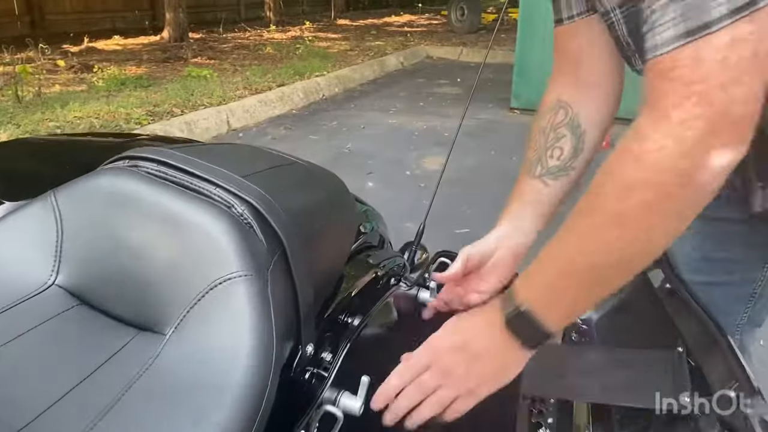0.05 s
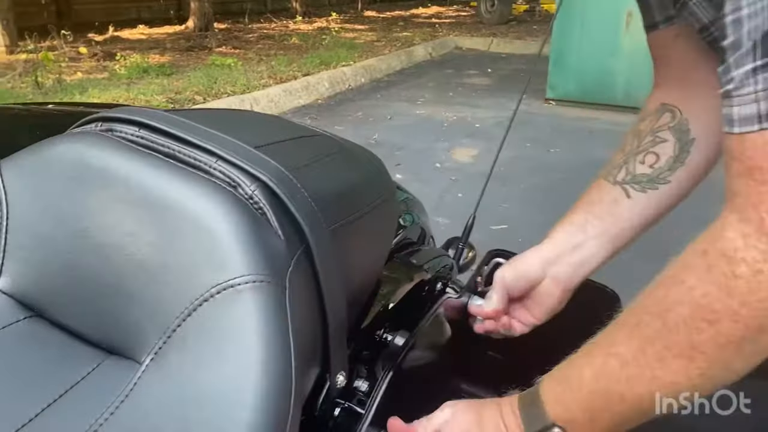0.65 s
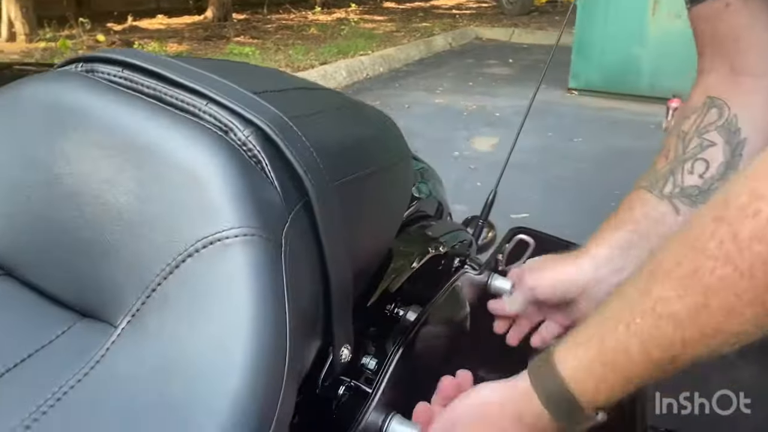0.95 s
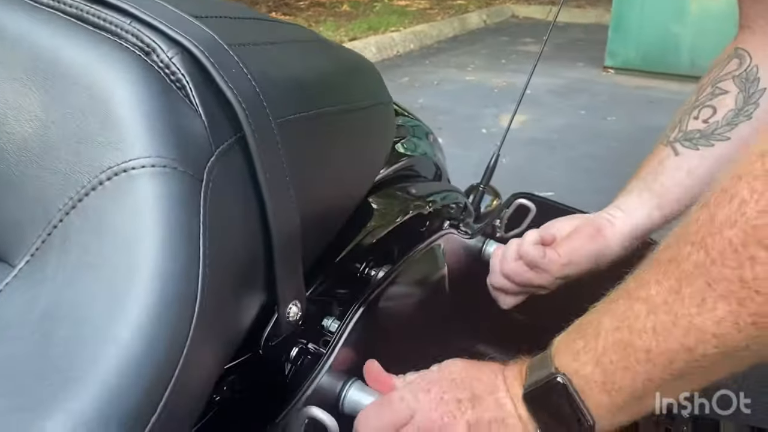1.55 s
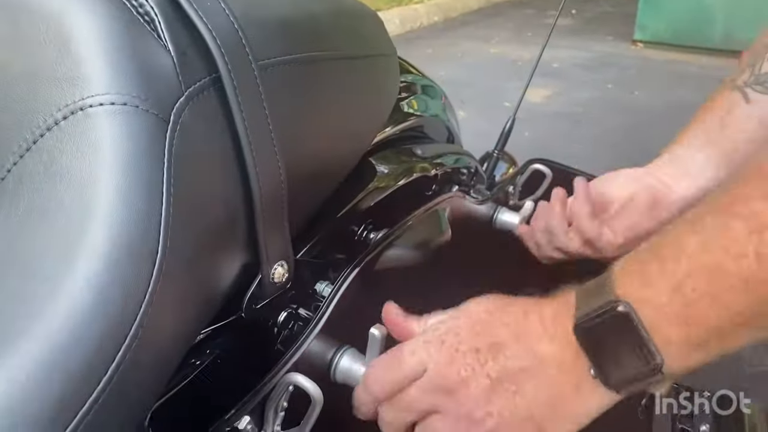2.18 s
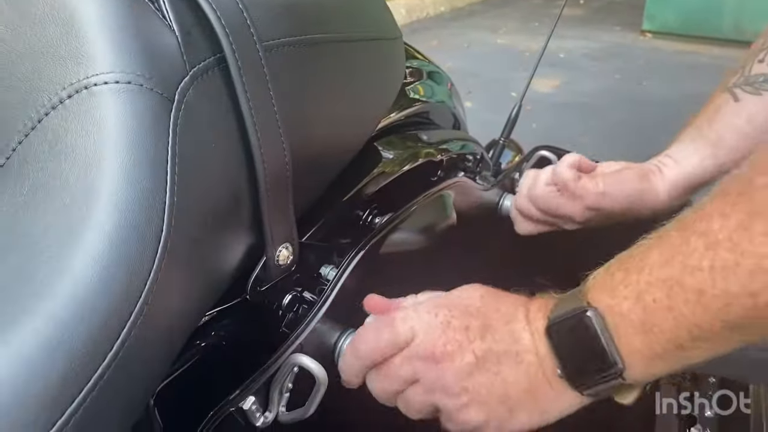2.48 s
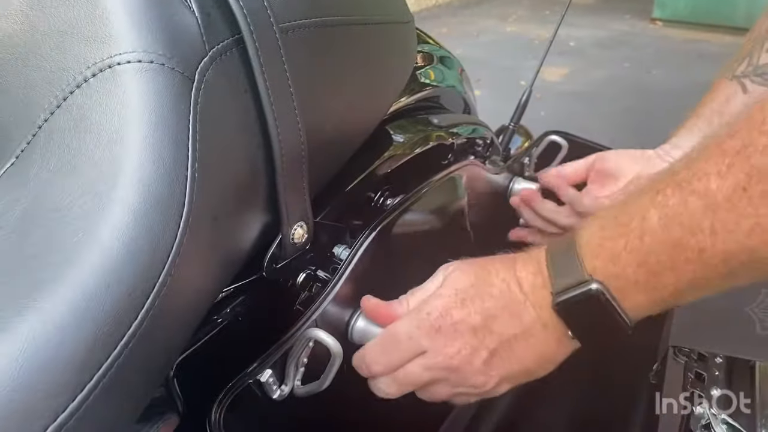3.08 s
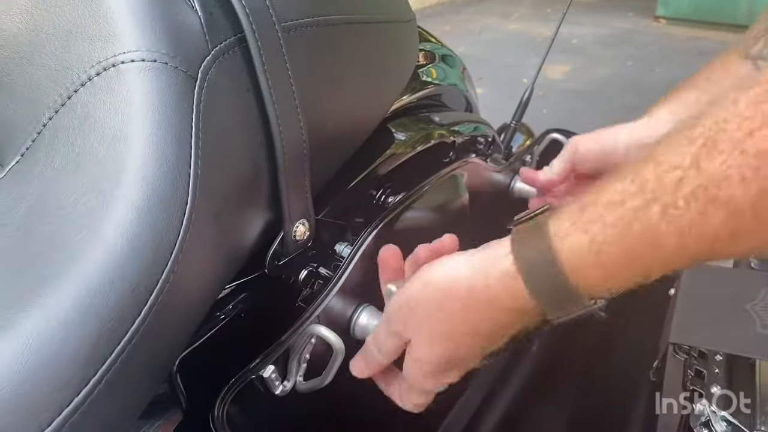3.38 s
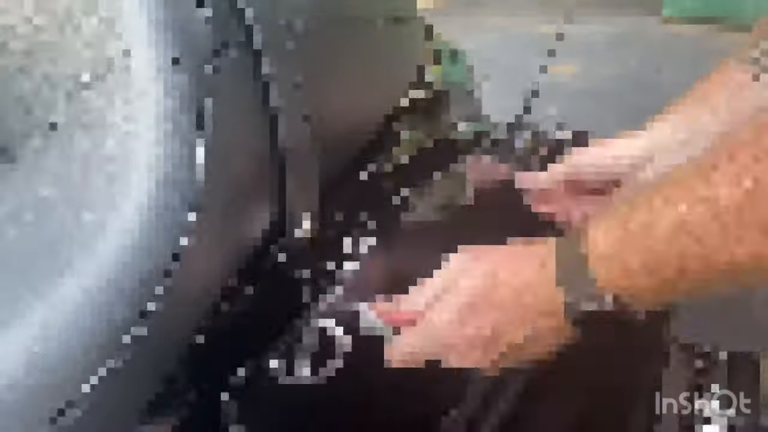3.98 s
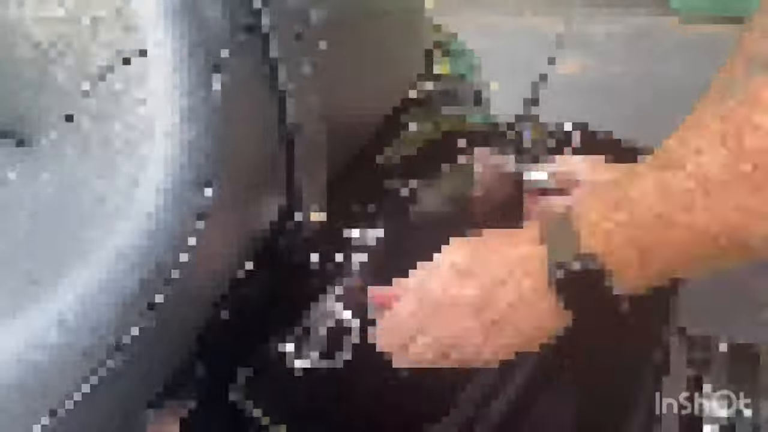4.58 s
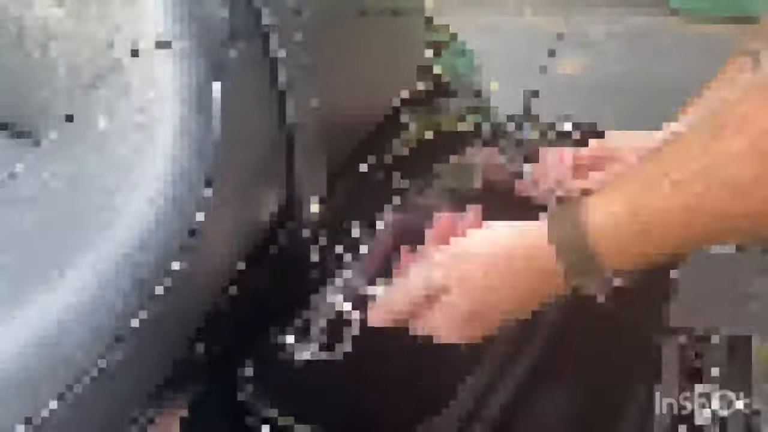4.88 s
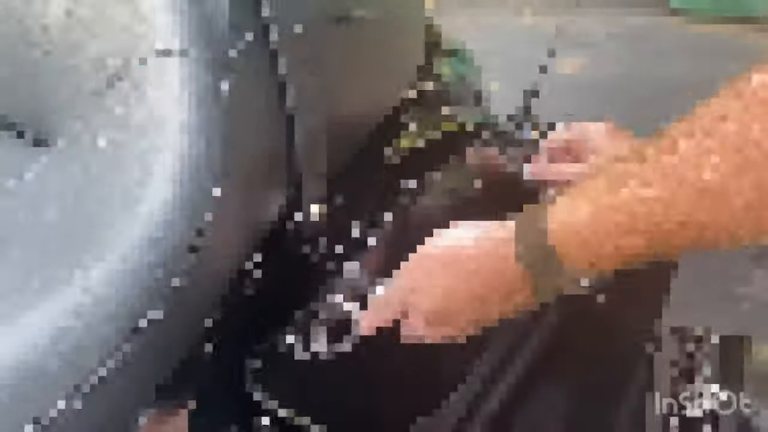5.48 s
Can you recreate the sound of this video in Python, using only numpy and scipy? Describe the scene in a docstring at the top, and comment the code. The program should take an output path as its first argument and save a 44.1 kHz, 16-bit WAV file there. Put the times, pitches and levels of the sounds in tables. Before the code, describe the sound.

Over a low outdoor rumble, steel handles are twisted close to the microphone, making irregular clacks and short gritty scrapes. Each firm contact draws a hollow knock from the plastic motorcycle saddlebag around them. Then the background suddenly changes to a dull hum like a distant machine. Against it, loose bolts click in their sockets, with faint finger rubbing and brief, very high squeaks from the threads.

```python
"""Outdoors at a motorcycle, two hands undo the steel fasteners inside a hard plastic saddlebag.
Steel handles clack and scrape in quick bursts; the hollow shell booms just after the hard contacts.
At 3.835 s a low rumble gives way abruptly to a steady drone. From there the fingers rub,
the bolts click in their sockets and the dry threads squeak."""
import sys
import numpy as np
from scipy import signal
from scipy.fft import rfft, irfft, next_fast_len
from scipy.io import wavfile
from scipy.ndimage import map_coordinates

SR = 44100
rng = np.random.default_rng(int(sys.argv[2]) if len(sys.argv) > 2 else 0)


def output_pcm(signal):
    """Save a mono or channel-first signal as 16-bit PCM at the path in sys.argv[1].

    Samples are clipped to [-1, 1] before scaling.
    """
    pcm = np.clip(np.atleast_2d(signal).T, -1, 1) * 32767
    wavfile.write(sys.argv[1], SR, np.round(pcm).astype(np.int16))


N = 248763
CHANGE_S, TOP_HZ = 3.835, 15900


def amp(db):
    """Decibels to gain."""
    return 10 ** (np.asarray(db) / 20)


def unit(x):
    """Scale to rms 1."""
    return x / np.sqrt(np.mean(x ** 2) + 1e-20)


def along(points, hz):
    """Interpolate (freq_hz, value) points on a log axis."""
    freqs, values = np.transpose(points)
    return np.interp(np.log(hz + 1), np.log(freqs), values)


def seconds(count):
    """Time axis of count samples."""
    return np.arange(count) / SR


def wobble(rate_hz):
    """Smooth random curve, rate_hz knots a second."""
    knots = rng.standard_normal(size=1000)
    coarse_s = seconds(N)[::64]
    return np.interp(seconds(N), coarse_s, map_coordinates(knots, [coarse_s * rate_hz], mode="mirror"))


def filtered(x, response):
    """Apply a frequency response."""
    n = x.shape[-1]
    padded = next_fast_len(n + 2048)
    return irfft(rfft(x, padded) * response(np.fft.rfftfreq(padded, 1 / SR)), padded)[..., :n]


def spread(pair, width):
    """Mid and side to left and right; width rows are freq_hz, side_db."""
    side = filtered(pair[1], lambda hz: amp(along(width, hz)))
    return np.array([pair[0] + side, pair[0] - side])


def add(track, start_s, sound):
    """Mix a sound into the track."""
    i = max(int(round(start_s * SR)), 0)
    track[:, i:i + sound.shape[1]] += sound[:, :max(N - i, 0)]


def noise(spectrum, width):
    """Steady coloured stereo noise."""
    coloured = filtered(rng.standard_normal((2, N)), lambda hz: amp(along(spectrum, hz)))
    return spread(unit(coloured), width)


def cavity(x, echo_db, t60_s):
    """The open box adds a brief, dense echo."""
    tail = rng.standard_normal((2, 5000)) * amp(-60 * seconds(5000) / t60_s)
    echo = signal.fftconvolve(x, tail / np.linalg.norm(tail[0]), axes=1)[:, :x.shape[1]]
    return x + amp(echo_db) * echo


# rumble spectrum: freq_hz, density_db
RUMBLE_SPECTRUM = [(18, -39), (28, -53), (42, 0), (60, 1), (130, 0), (190, -10), (300, -13), (480, -24.5),
                   (650, -24.5), (950, -29.5), (3000, -43.5), (6000, -56.5), (11000, -54), (16000, -56)]
# rumble stereo width: freq_hz, side_db
RUMBLE_SIDE = [(120, -17.5), (300, -6), (700, 0), (1500, 3.5), (3000, -8), (5500, -1), (7000, -13),
               (15000, -29)]


def rumble():
    """Low outdoor rumble; a soft high hiss flutters for the first second."""
    t = seconds(N)
    flutter = np.interp(t, [.9, 1.03], [1, 0]) * amp(3 * np.sin(2 * np.pi * 27 * t))
    hiss = flutter * noise([(5000, -12.5), (9500, -12), (13500, -3), (15200, 2)], width=[(15000, -17)])
    return amp(-39) * noise(RUMBLE_SPECTRUM, RUMBLE_SIDE) + amp(-59) * hiss


# drone noise spectrum: freq_hz, density_db
DRONE_SPECTRUM = [(40, -55), (90, -32), (130, -11), (165, -4.5), (210, 4.5), (350, -2.5), (560, -1),
                  (750, -13), (1000, -11), (2000, -24.5), (4000, -31.5), (8000, -44.5), (13000, -45.5),
                  (16000, -48)]
# drone stereo width: freq_hz, side_db
DRONE_SIDE = [(60, -6), (150, -17), (500, -15), (1300, -5), (2500, 0), (4400, 5.5), (8000, 6), (15000, -16)]
# drone tones: pitch_hz, level_db
DRONE_TONES = [(161.5, -53.5), (220.7, -49), (300, -51), (414.5, -51), (479.1, -50), (513, -68.5),
               (581.4, -52.5)]


def drone():
    """Wavering tones in dull noise, like a distant machine."""
    t = seconds(N)
    hum = np.zeros(N)
    for pitch_hz, level_db in DRONE_TONES:
        waver_db = 4.2 * wobble(6)
        hum += amp(level_db + 0.7 + waver_db) * np.sin(2 * np.pi * pitch_hz * t + 0.68 * wobble(9))
    return amp(-41 + 0.57 * wobble(7.5)) * noise(DRONE_SPECTRUM, DRONE_SIDE) + hum


# steel-on-steel spectrum: freq_hz, density_db
STEEL_SPECTRUM = [(200, 0), (500, 7), (750, 8), (1100, 4.5), (1600, -1), (2200, 2), (3200, -2),
                  (4500, -4.5), (6000, -5), (7500, -3.5), (11000, -7), (15000, -12)]


def chatter(envelope, treble_db, grain_db, t60_s, ring_db):
    """Gritty steel-on-steel chatter with a brief, random ringing smear."""
    n = len(envelope)
    slips = rng.standard_normal((2, n))
    slips *= amp(grain_db * np.repeat(rng.standard_normal(n // 20 + 1), 20)[:n])
    tail = rng.standard_normal((2, n)) * amp(-60 * seconds(n) / t60_s)
    smear = amp(ring_db) * tail / np.linalg.norm(tail[0])
    smear[:, 0] += 1  # direct sound
    x = signal.fftconvolve(slips * envelope, smear, axes=1)[:, :n]
    shelf = [(2000, 0.013), (11000, 1)]
    x = filtered(x, lambda hz: amp(along(STEEL_SPECTRUM, hz) + (treble_db + 13) * along(shelf, hz)))
    return unit(x) * np.sqrt(np.mean(envelope ** 2))


# stereo width of rubbing, shell and handles: freq_hz, side_db
BAG_SIDE = [(100, -20), (380, -12), (800, -9.5), (2400, -7.5), (5000, -4), (7000, -14), (15000, -56)]


def rubbing():
    """One early hand brush; later, fingers rub the bolts, grittier at each click and squeak."""
    t, grit_s = seconds(N), 0.013
    pressure = (t > CHANGE_S) * amp(4 * wobble(45))
    catches_s = np.sort([row[0] for row in BOLT_CLICKS + THREAD_SQUEAKS]) + grit_s / 2
    nearest_s = catches_s[np.searchsorted((catches_s[1:] + catches_s[:-1]) / 2, t)]
    grit = amp(-50.5) * np.exp(-((t - nearest_s) / grit_s) ** 2)
    brush = amp(-56) * np.exp(-((t - .21) / 0.018) ** 2)
    effort = (amp(-58) + grit) * pressure + brush
    return spread(chatter(effort, treble_db=-22, grain_db=6, t60_s=0.013, ring_db=1), BAG_SIDE)


# dry thread squeaks: start_s, level_db, pitch_hz
THREAD_SQUEAKS = [(3.8836, -51, 7730), (3.926, -47, 6700), (3.9452, -44.5, 11900), (4.0804, -34.5, 10060),
                  (4.169, -60, 6250), (4.2177, -50, 10000), (4.3823, -58, 7520), (4.4, -50, 11100),
                  (4.5288, -54, 7860), (4.692, -39.5, 9730), (4.804, -44, 9400), (4.82, -44, 10050),
                  (4.933, -54, 10800), (4.9524, -44, 14800), (4.9916, -59, 9200), (5.0845, -39, 11600),
                  (5.289, -42, 11900), (5.6093, -42.5, 12400)]


def threads():
    """A dry thread slips in nine rasping ticks whose thin ring climbs as the bolt speeds up."""
    x, t = np.zeros((2, N)), seconds(400)
    rasp_band = signal.butter(1, [1100, 8000], "bandpass", fs=SR)
    decay = amp(-60 * t / 0.024)
    for start_s, level_db, pitch_hz in THREAD_SQUEAKS:
        for progress in np.linspace(0, 1, num=9):
            jitter, size, detune = rng.standard_normal(3)
            tick_hz = min(pitch_hz * (.94 + .14 * progress + .07 * detune), TOP_HZ)
            tone = amp(level_db + 4) * np.sin(2 * np.pi * (tick_hz * t + rng.random((2, 1))))
            rasp = amp(-41) * signal.lfilter(*rasp_band, rng.standard_normal((2, len(t))))
            force = amp(1.4 * size - 15.3 * progress)
            add(x, start_s + 0.012 * progress + 0.0013 * jitter, force * (tone + rasp) * decay)
    return spread(x, width=[(3000, -8), (12000, -6)])


def ring(modes, tint_db, attack_s, scatter_db, detune, sag):
    """One blow of fixed energy: modes crest near together; sag drops their pitch as a panel relaxes."""
    hz, level_db, t60_s = np.transpose(modes)[:, :, None]
    t = seconds(int(t60_s.max() * SR))
    gain = amp(level_db + tint_db[:, None] - scatter_db * rng.standard_normal((2, len(hz), 1)))
    gain[1] *= rng.choice([-1, 1], size=hz.shape)  # each mode radiates to its own side
    clock_s = t - sag * 0.007 * np.exp(-t / 0.054)
    detuned_hz = hz * (1 + detune * rng.standard_normal(hz.shape))
    phase = 2 * np.pi * detuned_hz * (clock_s - np.interp(attack_s, t, clock_s))
    phase += 0.99 * rng.standard_normal(hz.shape)
    x = np.sum(gain * amp(-60 * t / t60_s) * np.cos(phase), axis=1)
    x *= 1 - np.exp(-(t / attack_s) ** 2)
    return x / np.sqrt(np.sum(x[0] ** 2) / SR / 0.0028)


# bolts clicking in their sockets: start_s, level_db, bright_db, pitch_hz
BOLT_CLICKS = [(3.8508, -14, -19.5, 937), (3.862, -18, -21, 1100), (3.888, -20.5, -18, 930),
               (3.948, -27.5, -4, 4300), (4.102, -20, -16, 1020), (4.222, -30, -16, 4970),
               (4.312, -20, -14, 873), (4.327, -12.5, 4, 2450), (4.387, -25, -24, 920),
               (4.406, -25.5, -18, 930), (4.422, -26, -28, 1090), (4.58, -22, -30, 870),
               (4.712, -21.5, -31, 840), (4.775, -15, -5, 887), (4.867, -27, -15, 860),
               (4.909, -23, -28, 1700), (5.024, -33, -5, 840), (5.226, -25.5, -14, 940),
               (5.293, -19.5, -35, 870), (5.384, -27, -40, 850)]
# bolt and bracket modes: freq_hz, level_db, t60_s
BOLT_MODES = [(859, -9.5, 0.069), (881, -3, 0.018), (1110, -9, 0.027), (1334, -10.5, 0.05),
              (1581, -6, 0.042), (1740, -5, 0.02), (2490, 2.5, 0.014), (2506, 0, 0.017),
              (2963, -4.5, 0.014), (3880, -13.5, 0.017), (4400, -7.5, 0.0095)]


def bolts():
    """Bolts click and rebound once, bright clicks waking the upper modes; loose bolts rattle between."""
    x = np.zeros((2, N))
    loose_hz, loose_bright_db, ring_cycles = 976, -18, 29
    rebounds = [(start_s + .03, level_db - 16.5, loose_bright_db, loose_hz)
                for start_s, level_db, _, _ in BOLT_CLICKS]
    rattle = [(CHANGE_S + when * (N / SR - CHANGE_S), -40.5 + 8.5 * force,
               loose_bright_db, loose_hz * (.84 + .32 * note))
              for when, force, note in rng.random(size=(64, 3))]
    for start_s, level_db, bright_db, pitch_hz in BOLT_CLICKS + rebounds + rattle:
        modes = np.array(BOLT_MODES + [(pitch_hz, 1, ring_cycles / pitch_hz)])
        tint_db = (bright_db + 6.5) * along([(1200, 0.087), (2300, 0.89)], modes[:, 0])
        tint_db[-1] = 0  # the contact's own note always sounds
        click = ring(modes, tint_db, attack_s=0.001843, scatter_db=1.5, detune=0.046, sag=0)
        crack_db = -18.5 + 0.14 * bright_db - 60 * seconds(click.shape[1]) / 0.01
        crack = np.diff(rng.standard_normal(click.shape), prepend=0) * amp(crack_db)
        add(x, start_s, amp(level_db - 5.5) * cavity(click + crack, echo_db=-8, t60_s=0.02))
    return spread(x, width=[(900, -13), (2500, -12.5), (5000, -9)])


PANEL_HZ, PANEL_T60_S = 234.7, 0.17
# hands bumping the shell: start_s, level_db, hardness_db, panel_hz
HAND_KNOCKS = [(0.93, -24.5, -13, 252), (1.1, -27, -43, 203.7), (2.329, -26, -30, 226),
               (2.936, -22, 11, 296), (3.043, -26.5, -11, 279), (3.487, -15.5, 5.5, 266),
               (3.579, -24, -1, 338)]


def blows():
    """Blows on the shell, in HAND_KNOCKS columns: clacks, handles at their stops, knocks, nudges."""
    clacks = [(start_s + 1.5 * swell_s, boom_db, rng.standard_normal(), panel_hz)
              for start_s, _, swell_s, _, boom_db, panel_hz in HANDLE_CLACKS]
    stops = [(end_s - 0.014, level_db + 10.5, -2, PANEL_HZ)
             for _, end_s, level_db, _, _ in HANDLE_SCRAPES]
    nudges = [(when * CHANGE_S, -43.5 + 12.5 * force, -4.5, PANEL_HZ * (0.793 + 0.38 * spot))
              for when, force, spot in rng.random(size=(20, 3))]
    return clacks + stops + HAND_KNOCKS + nudges


# hollow shell modes: freq_hz, level_db, t60_s
SHELL_MODES = [(94, -3.5, 0.036), (137.7, -9, 0.21), (221, -7, 0.21), (288.4, 0.5, 0.079), (390, -4, 0.11),
               (427, -19, 0.21), (611, 3.5, 0.097), (664, 7, 0.046), (810, -14.5, 0.16), (1038, -12, 0.13),
               (1086, -31.5, 0.13), (1270, -18, 0.064)]
# drive of an ordinary blow on panel, wall and rim: freq_hz, gain_db
BLOW_SPECTRUM = [(320, 1.5), (370, 0), (470, 13.5), (590, -8)]


def shell():
    """The plastic box booms on the struck panel's note; harder blows bring in more wall and rim."""
    x = np.zeros((2, N))
    for start_s, level_db, hardness_db, panel_hz in blows():
        t60_s = PANEL_T60_S * (PANEL_HZ / panel_hz) ** 1.1  # stiffer spots ring higher and shorter
        modes = np.array([(panel_hz, 0, t60_s)] + SHELL_MODES)
        upper_share = along([(320, 0), (370, 0.098), (590, 1)], modes[:, 0])
        tint_db = along(BLOW_SPECTRUM, modes[:, 0]) + hardness_db * upper_share
        boom = ring(modes, tint_db, attack_s=0.003885, scatter_db=1, detune=0.06, sag=0.059)
        add(x, start_s, amp(level_db) * cavity(boom, echo_db=-15.5, t60_s=0.091))
    return spread(x, BAG_SIDE)


# colour of a sliding contact: freq_hz, gain_db
SLIDE_SPECTRUM = [(200, 4), (600, -5), (1100, 0)]


def scrape(t, length_s, treble_db, grind_hz):
    """A handle turns under uneven pressure; the sliding contact grinds on its own note."""
    def response(hz):
        resonance_db = 3 / (1 + ((hz / grind_hz - 1) / 0.069) ** 2)
        return amp(along(SLIDE_SPECTRUM, hz) + resonance_db)
    rise_s, release_s = 0.12 * length_s, 0.0079
    grip = (np.tanh(t / rise_s) - np.tanh((t - length_s) / release_s)) / 2
    ease_db = -0.5 * (np.clip(t / length_s, 0, 1) - .5)
    stroke = grip * amp(ease_db + 2.2 * wobble(170)[:len(t)])
    return filtered(chatter(stroke, treble_db + 0.5, grain_db=5, t60_s=0.035, ring_db=1.5), response)


# steel handle resonances: freq_hz
HANDLE_MODES_HZ = [1066, 1192, 1574, 1920, 2030, 2552, 2950, 3744, 4340, 4970, 6800]


def handle_ring(x, lag_s, ring_db, width_hz):
    """The handles ring thinly, and the panel carries their treble faster than their bass."""
    def response(hz):
        peaks = sum(1 / (1 + ((hz - mode_hz) / width_hz) ** 2) for mode_hz in HANDLE_MODES_HZ)
        dispersion = np.exp(-2j * np.pi * lag_s * (2 * np.sqrt(3000 * hz) - hz))
        return (1 + amp(ring_db) * peaks) * dispersion
    return filtered(x, response)


# steel contacts: start_s, level_db, swell_s, treble_db, boom_db, panel_hz
HANDLE_CLACKS = [(0.446, -33, 0.0068, -20, -17.5, 216), (0.4882, -36, 0.0069, -21.5, -16, 231),
                 (0.5736, -26, 0.006, -20.5, -16, 251), (0.622, -34, 0.0074, -18, -14, 306),
                 (0.663, -29, 0.0073, -18.5, -15.5, 216.7), (0.762, -51, 0.0052, -26, -27.5, 237),
                 (0.8282, -48.5, 0.0043, -27, -33, 238), (0.8656, -26.5, 0.00413, -25.5, -9.5, 235),
                 (1.061, -49.5, 0.0051, 44, -59, 240), (1.085, -46.5, 0.001, -3, -57, 240),
                 (1.122, -53, .0045, 1, -59, 240), (1.427, -25.5, 0.0059, -19, -16, 202),
                 (1.5656, -31, 0.00398, -10, -15.5, 186), (1.619, -27, 0.0067, -24.5, -10.5, 277),
                 (1.73, -26, 0.0085, -26, -9, 258), (1.787, -37, 0.0053, -21, -25, 230),
                 (1.859, -39, 0.0075, -32, -18, 232), (2.074, -48.5, 0.0024, -12, -52, 234),
                 (2.197, -43.5, 0.00345, 2.5, -35.5, 237), (2.404, -19.5, 0.0066, -21.5, -4.5, 237.5),
                 (2.5005, -23.5, 0.0072, -19, -11.5, 226), (2.5858, -27, 0.0096, -19.5, -13, 260),
                 (2.779, -54.5, 0.0046, -16, -31, 276), (2.9334, -38.5, 0.0023, -24, -34, 288),
                 (3.3305, -46.5, 0.0053, -13, -25, 239), (3.481, -47, .004, -10, -24, 246)]
# handles dragged round: start_s, end_s, level_db, treble_db, grind_hz
HANDLE_SCRAPES = [(0.536, 0.59, -41, -13, 1900), (0.636, 0.685, -40.5, -15, 2320),
                  (0.688, 0.754, -54, -16, 3330), (1.488, 1.546, -38, -12.5, 1340),
                  (1.641, 1.708, -36, -16, 2940), (2.373, 2.393, -33.5, -17, 3320),
                  (2.465, 2.489, -31, -14, 1860), (2.534, 2.568, -39.5, -13, 2600),
                  (2.614, 2.653, -25.5, -20, 1200), (3.078, 3.104, -50, -7, 2000),
                  (3.098, 3.158, -32.5, -14.5, 1260), (3.157, 3.202, -38, -15, 1990),
                  (3.209, 3.253, -30.5, -19.5, 1200), (3.355, 3.481, -59, -8, 3000),
                  (3.623, 3.656, -36, -11, 2160), (3.668, 3.717, -36.5, -13.5, 1380),
                  (3.746, 3.774, -38.5, -5, 3480), (3.81, 3.817, -44, -11, 2450)]


def handles():
    """Quick clacks snap, slow ones slide in first; scrapes last while a handle turns."""
    x, lead_s = np.zeros((2, N)), .02
    t = seconds(6500) - lead_s
    for start_s, level_db, swell_s, treble_db, _, _ in HANDLE_CLACKS:
        progress = t / swell_s
        since_hit = np.maximum(progress - .25, 0) / 0.76
        snap = (since_hit * np.exp(1 - since_hit)) ** 1.13
        slowness = np.clip((swell_s - .0052) / 0.0072, 0, 1)
        slide = 1.55 * slowness * np.exp(-np.abs(progress - 1) * 1.11)
        clack = chatter(np.hypot(snap, slide), treble_db + 2.5, grain_db=2.5, t60_s=0.01, ring_db=-2)
        add(x, start_s - lead_s, amp(level_db + 2.5) * clack)
    for start_s, end_s, level_db, treble_db, grind_hz in HANDLE_SCRAPES:
        add(x, start_s - lead_s, amp(level_db) * scrape(t, end_s - start_s, treble_db, grind_hz))
    steel = handle_ring(x, lag_s=0.0029, ring_db=-2, width_hz=20.8)
    return spread(cavity(steel, echo_db=-19.5, t60_s=0.19), BAG_SIDE)


def widen_treble(x):
    """Above 7 kHz, left and right go in and out of phase with frequency."""
    def response(hz):
        turn_rad = np.pi * np.maximum(hz - 7000, 0) / 2070
        return np.exp(.5j * (turn_rad - 0.32 * np.sin(2 * turn_rad)) * np.array([[-1], [1]]))
    return filtered(x, response)


def scene():
    """Busy handling over the rumble, then light clicking over the drone."""
    crossfade = np.clip((seconds(N) - CHANGE_S) / 0.022 + .5, 0, 1)
    shell_pan = amp([[-.6], [.6]])
    early = widen_treble(handles() + shell() * shell_pan + (1 - crossfade) * rumble())
    return early + bolts() + threads() + rubbing() + crossfade * drone()


def record(dry):
    """Soft peak limit, then a steep low-pass."""
    rounded = dry / (1 + np.abs(dry / .82) ** 6) ** (1 / 6)
    return filtered(rounded, lambda hz: 1 / np.sqrt(1 + (hz / TOP_HZ) ** 200))


dry = scene()
out = record(dry)
output_pcm(out)
```